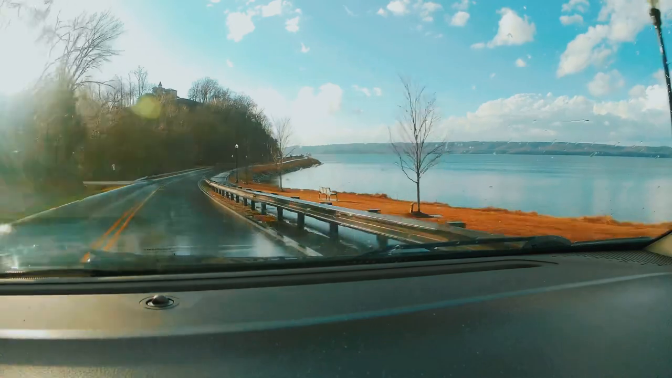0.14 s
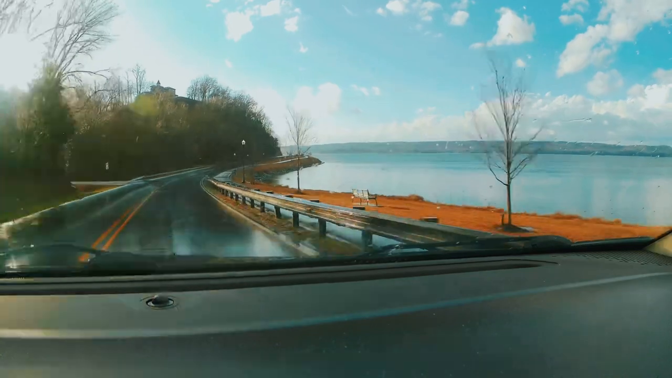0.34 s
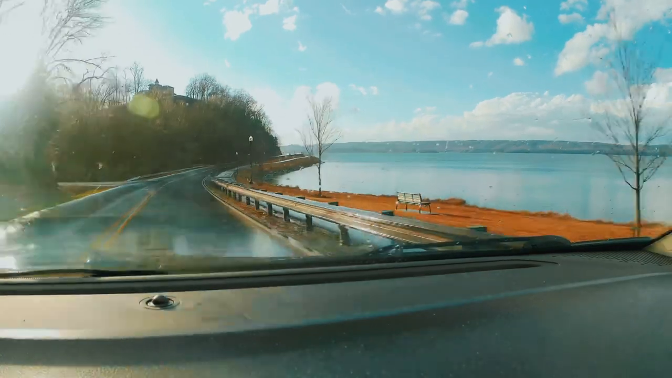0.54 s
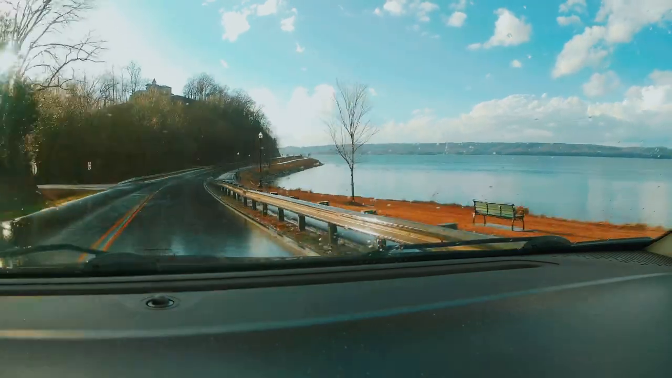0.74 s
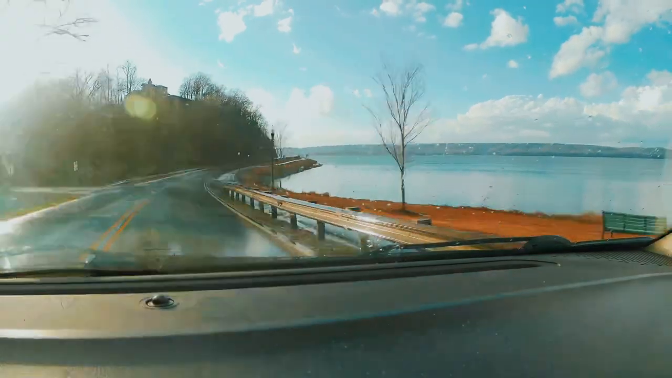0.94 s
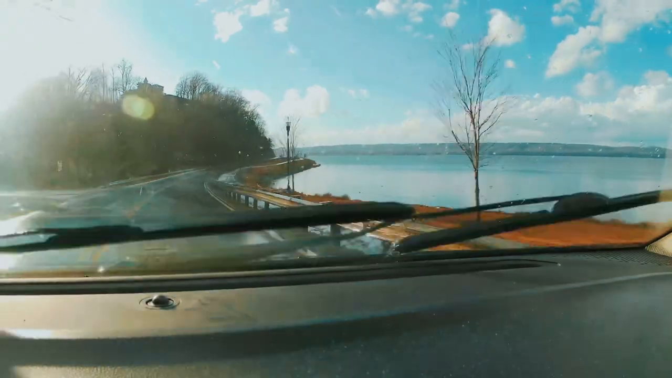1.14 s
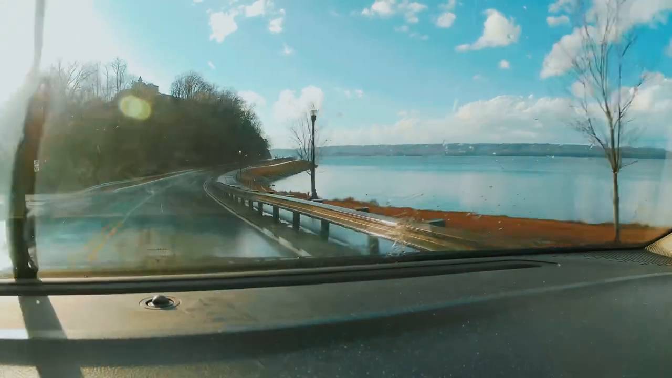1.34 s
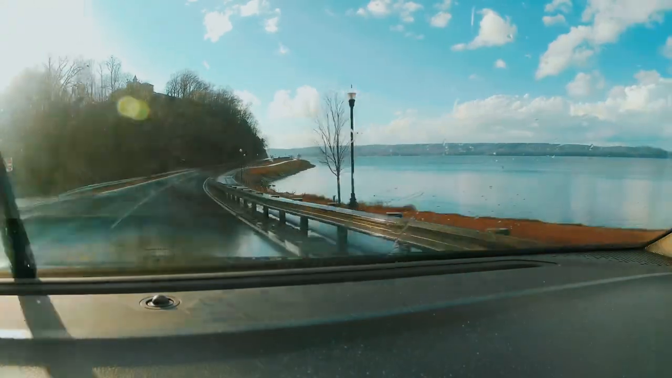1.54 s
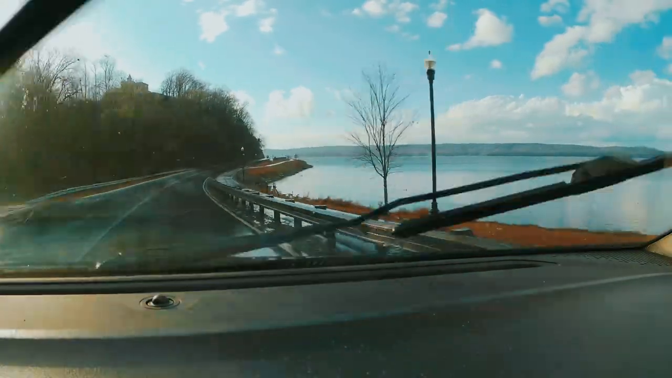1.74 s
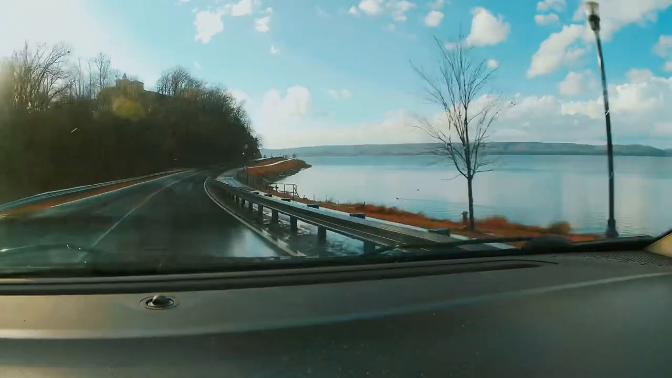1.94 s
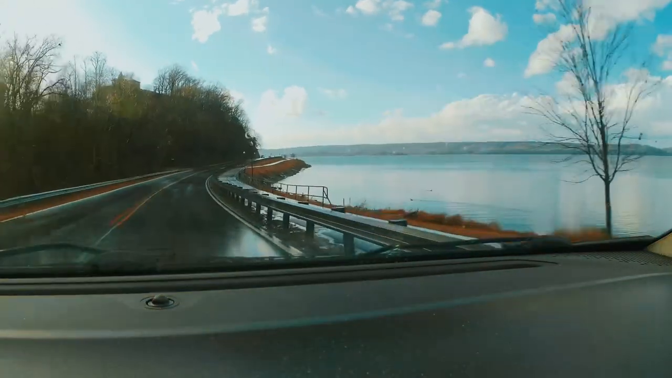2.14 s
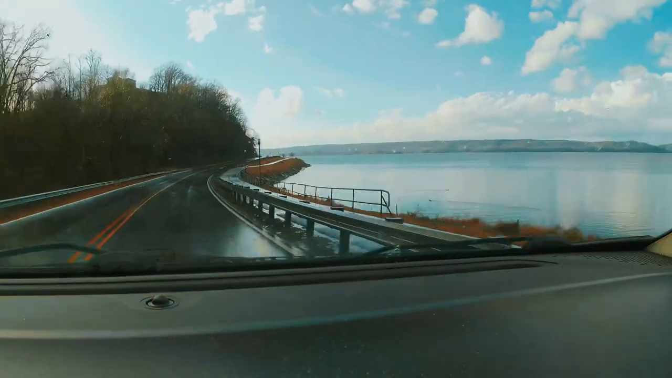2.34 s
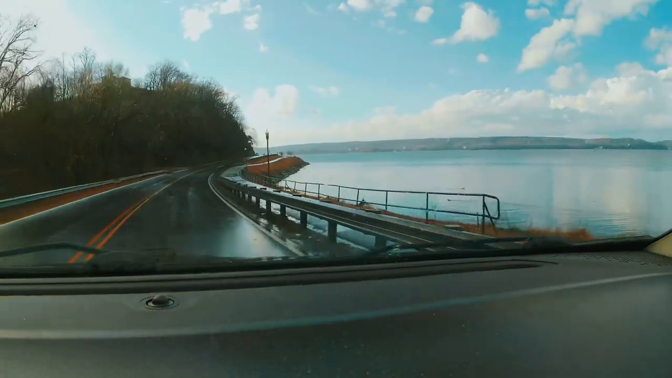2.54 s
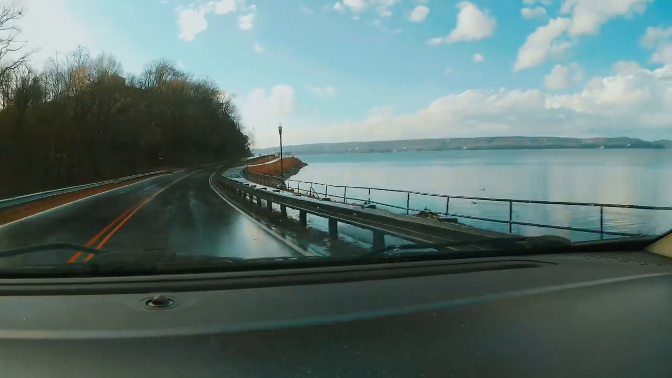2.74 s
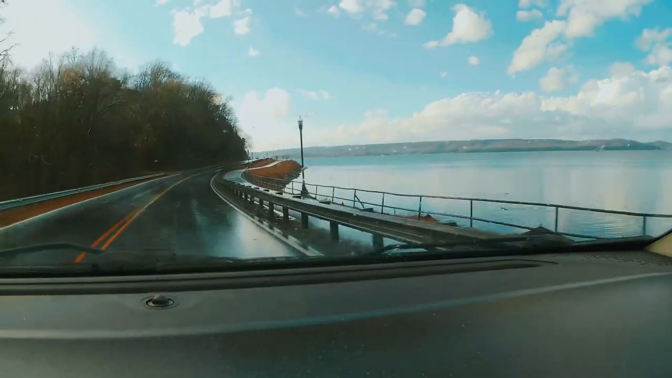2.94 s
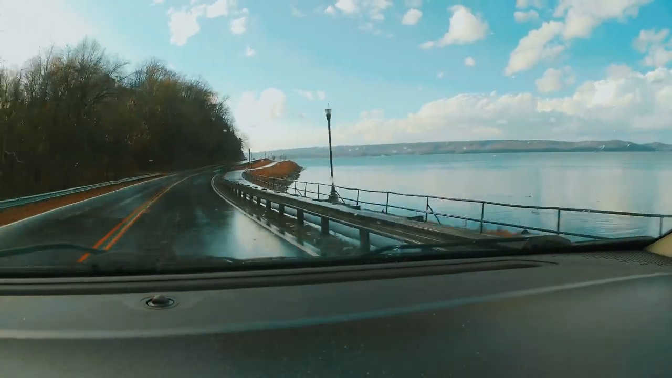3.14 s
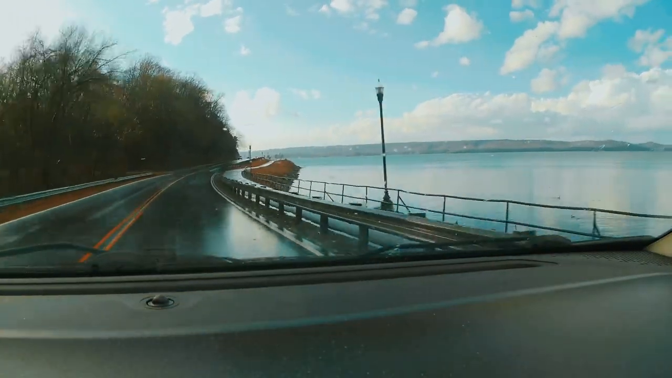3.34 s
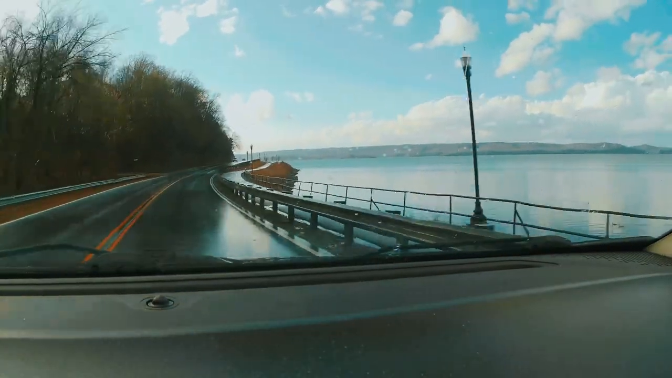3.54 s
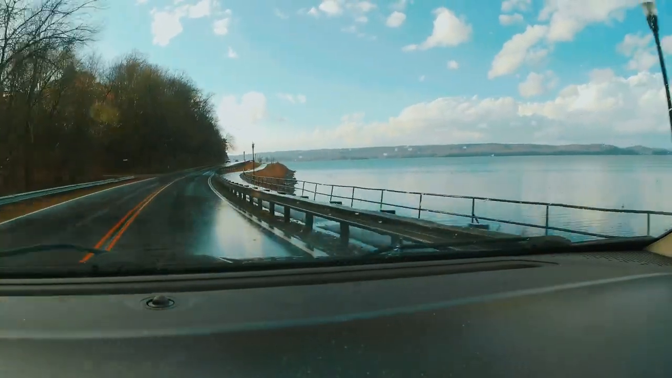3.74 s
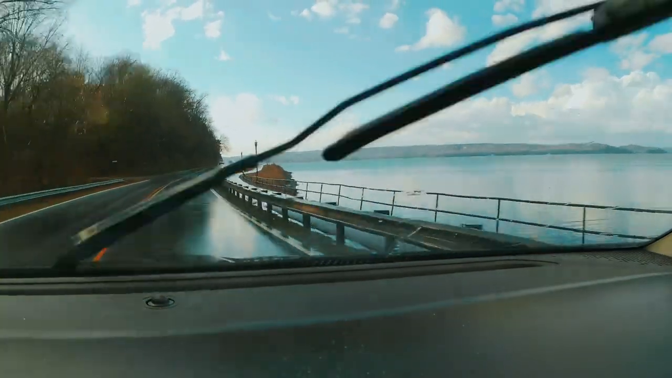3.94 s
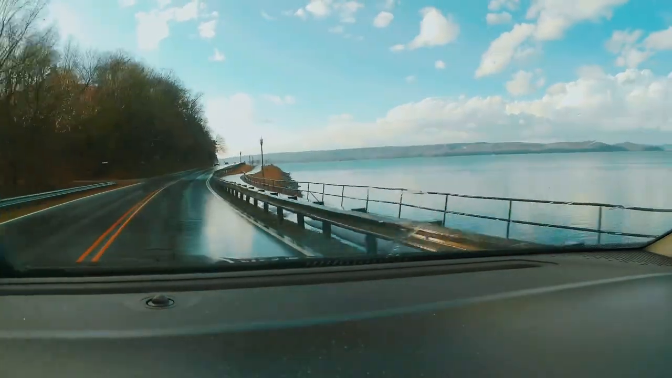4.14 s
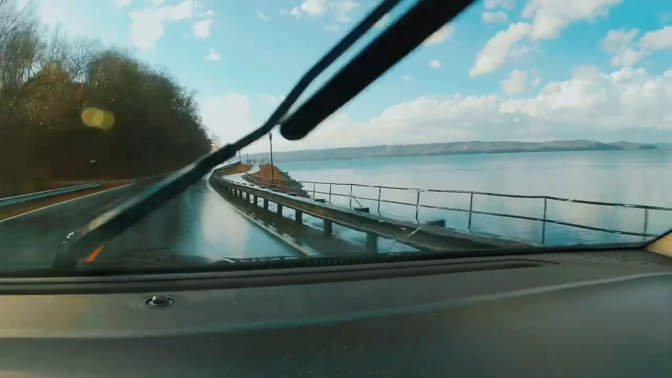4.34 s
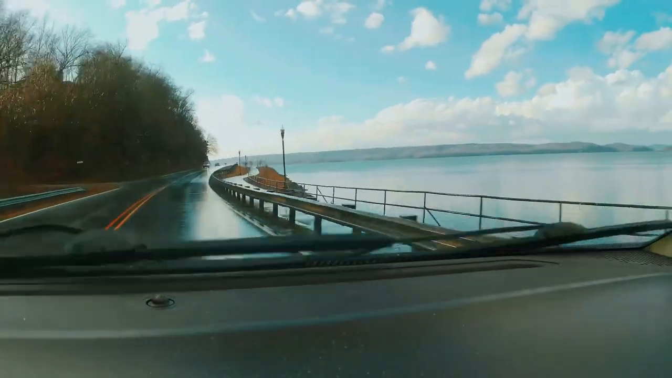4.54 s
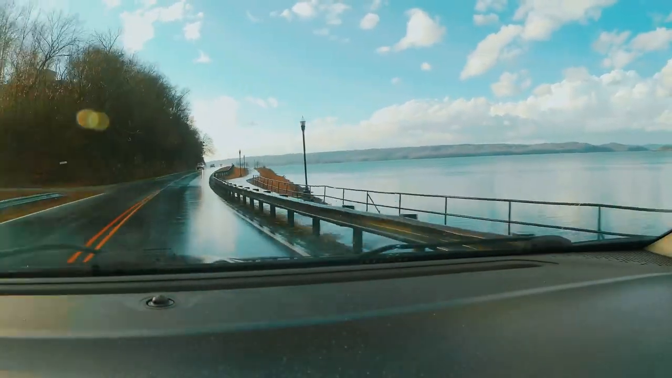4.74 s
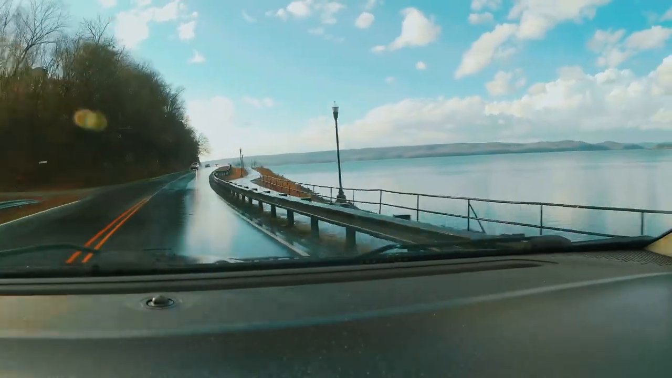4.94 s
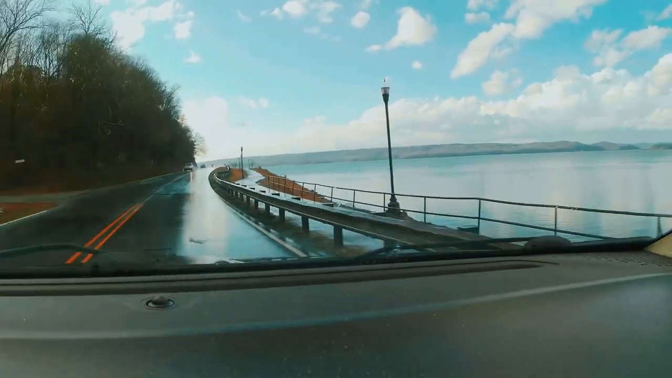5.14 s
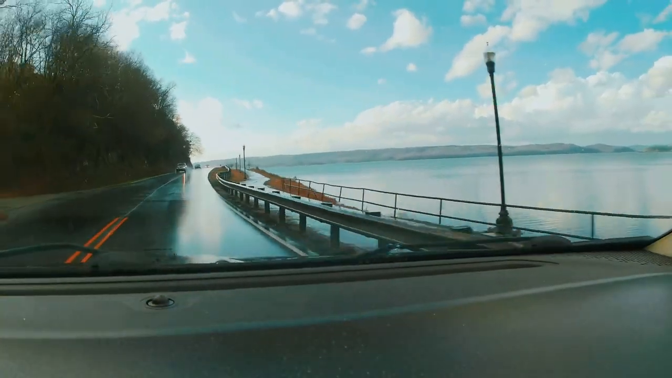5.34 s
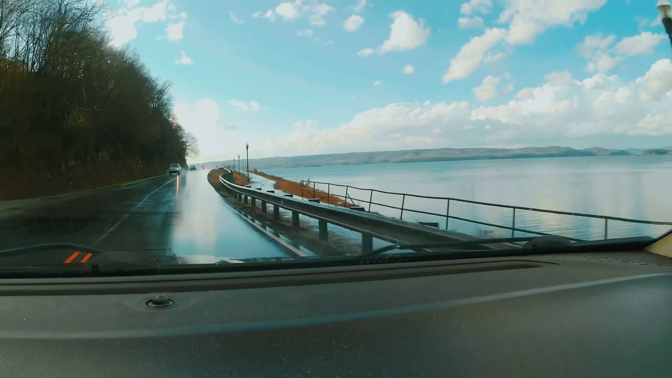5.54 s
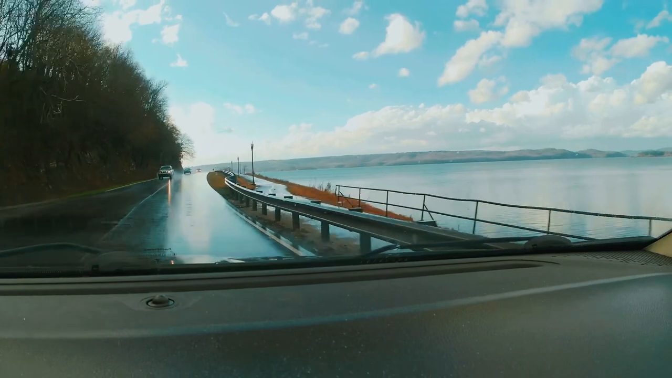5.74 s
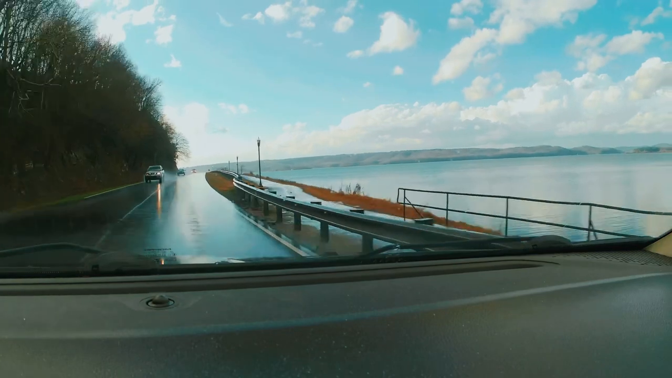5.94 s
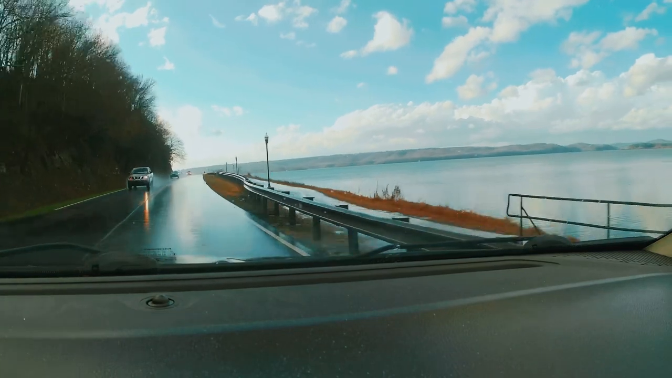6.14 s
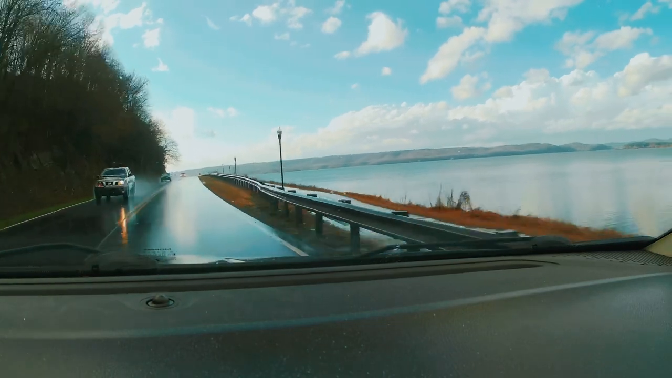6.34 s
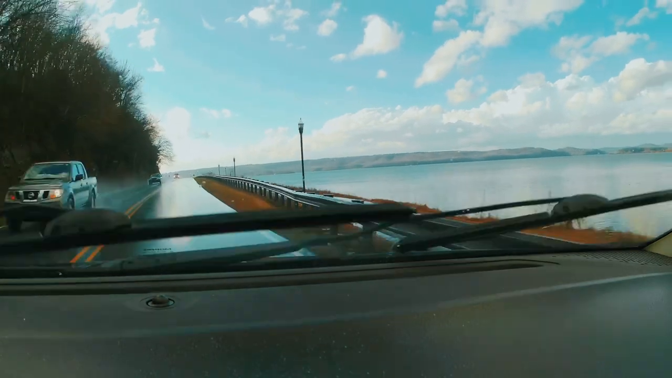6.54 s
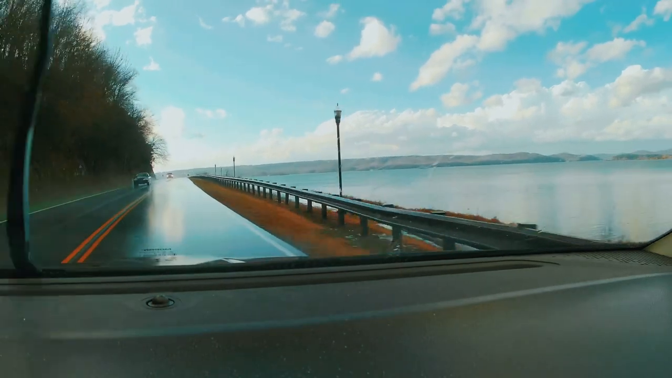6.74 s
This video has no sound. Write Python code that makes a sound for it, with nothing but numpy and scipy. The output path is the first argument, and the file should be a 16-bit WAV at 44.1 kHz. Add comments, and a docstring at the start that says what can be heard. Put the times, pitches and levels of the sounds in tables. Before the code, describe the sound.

Steady low road rumble fills a closed car cabin, swelling with small bumps. Three times, a few seconds apart, a rubber wiper blade sticks and slips across the windscreen in rapid buzzing stutters, with sharp little ticks and a soft thump as it turns or settles. Very faint squeaks follow the second pass. Close, dry, mono interior perspective; the last pass is shorter and ends with a double knock.

```python
"""Wipers juddering in a moving car

Inside a car on a wet road, heard in mono from the cabin: the windscreen close, the road beneath.
Every few seconds the wiper blades drag across nearly dry glass. Stick-slip pulses ring glass resonances,
short noise bursts make the snaps and knocks, and arching near-sines make the faint squeaks.
Behind them resonated noise booms in the cabin, banded noise makes tyre roar and spray hiss,
and one faint whine rises and falls."""
import sys
import numpy as np
from scipy import signal
from scipy.io import wavfile
from scipy.ndimage import uniform_filter1d

SR = 44100
rng = np.random.default_rng(int(sys.argv[2]) if len(sys.argv) > 2 else 0)


def generate_wav(signal):
    """Clip the signal to [-1, 1] and save it as 16-bit WAV at the path in sys.argv[1]."""
    frames = np.transpose(np.atleast_2d(signal))
    scaled = np.clip(frames, -1, 1) * 32767
    pcm = np.round(scaled).astype(np.int16)
    wavfile.write(sys.argv[1], SR, pcm)


def volts(x):
    """Linear amplitude factor 10**(x/20) for a level x in dB, scalar or array-like."""
    e = np.asarray(x, float) / 20
    return 10 ** e


N = 303408   # samples


def in_time(rows):
    """Table columns joined by straight lines, one value a sample."""
    s, *columns = np.transpose(rows)
    return [np.interp(np.arange(N) / SR, s, c) for c in columns]


def rms_one(x):
    """Scales to unit rms."""
    return x / np.sqrt(np.mean(x ** 2) + 1e-20)


def drift(corner_hz):
    """Slow chance of spread 1: noise drawn every 40 samples through a double one-pole low-pass, run in."""
    r = np.exp(-2 * np.pi * corner_hz * 40 / SR)
    noise = rng.standard_normal(N // 40 + 2002)
    slow = signal.lfilter([1], [1, -2 * r, r * r], noise)[2000:]
    return np.interp(np.arange(N) / 40, np.arange(len(slow)), rms_one(slow))


def resonate(x, modes):
    """Parallel resonances with alternating signs."""
    out = 0
    for k, (hz, width_hz, db) in enumerate(modes):
        r = np.exp(-np.pi * width_hz / SR)
        b = np.array([1, 0, -1]) * (1 - r * r) / 2
        a = [1, -2 * r * np.cos(2 * np.pi * hz / SR), r * r]
        out = out + (-1) ** k * volts(db) * signal.lfilter(b, a, x + 1e-18)
    return out


def cut(x, hz, kind, order):
    """Butterworth low-, high- or band-pass."""
    return signal.sosfilt(signal.butter(order, hz, kind, fs=SR, output="sos"), x)


def evened(x, span_s):
    """Divides out the local level, so that a curve can set it."""
    return x / np.sqrt(uniform_filter1d(x ** 2, int(span_s * SR)) + 1e-20)


def dying(x, time_s):
    """Every click becomes a falling exponential."""
    return signal.lfilter([1], [1, -np.exp(-1 / (time_s * SR))], x + 1e-18)


def arch(start_s, length_s):
    """Position within a spell, -1 to 1, and a hump that is one in its middle."""
    place = np.clip(2 * (np.arange(N) / SR - start_s) / length_s - 1, -1, 1)
    return place, 1 - place ** 2


def thin_tone(start_s, length_s, hz, db, sag, waver, octave_db):
    """A wavering near-sine with a weak octave; its pitch arches up and down."""
    place, hump = arch(start_s, length_s)
    pitch_hz = hz * (1 - sag * place ** 2 + waver * drift(80))
    phase = 2 * np.pi * np.cumsum(pitch_hz) / SR
    wave = np.sin(phase) + volts(octave_db) * np.sin(2 * phase)
    level = volts(db + 3.3 * drift(60))
    return np.sqrt(2) * np.minimum(3 * hump, 1) * level * wave


# Spells in which the blade grips the glass; dryness favours the upper ring and the rasp:
# start_s, length_s, judder_db (before the sag), slips_per_s (around which the rate wanders), dryness_db
GRIP_SPELLS = [(1.083, 0.022, -33.5, 180, 1.5), (1.1, .035, -26, 184, -2), (1.145, .022, -25.5, 150, 3.5),
               (1.168, 0.043, -15.5, 130.6, -0.5), (1.222, .055, -19, 114.5, -1),
               (1.281, 0.03026, -26.5, 114, -11), (1.325, 0.0396, -27, 173, 0.5),
               (1.371, 0.066, -24, 150, 5), (1.435, 0.029, -23, 182, -9.5), (1.474, .02, -27, 174, -8),
               (1.499, 0.032, -31.5, 190, -11), (3.788, .025, -31, 179, 5), (3.81, 0.025, -22.5, 174, 1.5),
               (3.829, 0.048, -16.5, 180, 3.5), (3.872, .045, -17.5, 173, 3), (3.919, .052, -15, 162, -5),
               (3.972, .045, -29, 164, -5.5), (4.04, 0.033, -25, 185, 5.5), (4.114, 0.026, -27.5, 168, 0),
               (4.155, 0.017, -36, 185, -14), (4.19, 0.023, -29.5, 165, -6), (6.508, 0.025, -30, 184, 4),
               (6.52, .02, -29, 175, 6), (6.537, 0.044, -17.5, 163, 1), (6.588, 0.027, -17, 175, -1.5),
               (6.61, 0.039, -21.5, 186, -3), (6.644, .05, -29, 158, 2)]


def grip(follows):
    """Every spell rises, sags while it holds and dies away; a layer gains its share of the dryness."""
    attack_s, release_s, full_sag_db = 0.0075, 0.014, 3.5
    t, power = np.arange(N) / SR, 0
    for s, length_s, db, _, dry_db in GRIP_SPELLS:
        rise = np.clip((t - s) / attack_s, 0, 1)
        fall = np.exp(-np.maximum(t - s - length_s, 0) / release_s)
        sag_db = full_sag_db * np.clip((t - s) / length_s, 0, 1)
        power = power + (volts(db + follows * dry_db - sag_db) * rise * fall) ** 2
    return np.sqrt(power)


# Low windscreen resonances: pitch_hz, width_hz, gain_db
GLASS_MODES = [(191, 46.4, 0), (239.4, 66.4, 0), (324, 26.6, 1.5), (485, 87, -11)]
# Upper ring of glass and arm: pitch_hz, width_hz, gain_db
UPPER_MODES = [(632, 160, -2), (872, 124, -4), (960, 160, -7.5), (1315, 400, -14.5)]
# Resonances of the rubber edge: pitch_hz, width_hz, gain_db
RUBBER_MODES = [(1730, 230, 4), (2600, 1330, -3.5), (3650, 720, -4), (4500, 890, -8.5)]
# Share of noise in the slips; the blade sings almost cleanly late in the second sweep: time_s, roughness (0-1)
SLIP_ROUGHNESS = [(1.1, .48), (1.3, .42), (1.5, .46), (3.88, .46), (3.94, .24), (4.02, .18), (4.05, .38),
                  (6.55, .44), (6.7, .4)]
UPPER_DB, RASP_DB = -13.5, -26.5   # over the judder at dryness 0


def judder():
    """The rubber sticks and slips; every slip jolts the glass and lets out a short rasp."""
    per_s, = in_time([(s + length_s / 2, rate) for s, length_s, _, rate, _ in GRIP_SPELLS])
    rough, = in_time(SLIP_ROUGHNESS)
    turns = np.cumsum(per_s * (1 + 0.0927 * rough * drift(42.5))) / SR
    ticks = np.diff(np.floor(turns), prepend=0)   # one click per whole turn
    slips = ticks * volts(8.4 * rough * drift(140)) * np.sqrt(SR / per_s)
    drive = (1 - rough) * slips + rough * rng.standard_normal(N)
    low = cut(cut(resonate(drive, GLASS_MODES), 600, "low", order=2), 140, "high", order=2)
    upper = cut(cut(resonate(drive, UPPER_MODES), 1900, "low", order=2), 450, "high", order=2)

    puffs = 0.023 * dying(slips, 0.0028)   # hiss dies soon after each slip
    rasp = rng.standard_normal(N) * (0.11 + puffs) * volts(1.8 * drift(70))
    edge = cut(resonate(rasp, RUBBER_MODES), 5500, "low", order=2)
    fizz = cut(cut(rasp, 5100, "high", order=2), 9000, "low", order=1)   # fine, from the lip
    edge += volts(-33.5) * fizz

    glass_part = grip(0) * evened(low, 0.044)
    upper_part = volts(UPPER_DB) * grip(1) * evened(upper, 0.42)
    rasp_part = volts(RASP_DB) * grip(1) * evened(edge, 0.039)
    return glass_part + upper_part + rasp_part


# Sharpest breaks of the rubber lip: time_s, click_db (before the filters and their gains)
LIP_BREAKS = [(1.173, -44.5), (1.2029, -46.5), (1.213, -40), (1.2382, -43.5), (1.248, -46), (1.255, -43.5),
              (1.2633, -41), (1.3788, -43), (1.385, -44), (1.4155, -45.5), (1.4762, -42.5), (3.821, -41.5),
              (3.854, -33.5), (3.8727, -38), (3.887, -37), (3.9, -36.5), (3.9237, -35), (3.9614, -36.5),
              (4.0483, -46.5), (4.123, -48), (4.1998, -53), (6.554, -38.5), (6.566, -30.5), (6.615, -43.5),
              (6.6261, -31.5), (6.641, -39)]


def snaps():
    """Each break is a sharp tick and milliseconds of crackle through the rubber edge."""
    small_per_s, small_db = 55, -4.5   # lesser breaks at random; click level over the rasp setting
    s, db = np.transpose(LIP_BREAKS)
    clicks = (rng.random(N) < small_per_s / SR) * volts(RASP_DB + small_db) * grip(0.96)
    clicks[(s * SR).astype(int)] = volts(db)
    noise = rng.standard_normal(N)
    tick = cut(dying(clicks, 0.0012) * noise, 5400, "high", order=2)
    tick = cut(tick, 9000, "low", order=1)
    crackle = cut(resonate(dying(clicks, 0.0028) * noise, RUBBER_MODES), 2500, "high", order=1)
    return volts(-5.5) * tick + volts(12.5) * crackle


# Blades flipping or reaching their rest: start_s, drive_db (peak, before the resonances),
# length_s (the peak comes at 0.27 of it), edge_db (rubber contact over the drive)
BLADE_KNOCKS = [(1.876, -25.5, 0.029, -19), (4.593, -24.5, 0.032, -17.5), (4.634, -35, 0.023, -17),
                (6.506, -26, 0.017, -15), (6.811, -23.5, 0.013, -12), (6.827, -26, 0.029, -13.5)]


def knocks():
    """A brief rattle of the arm that swells, dies and rings the glass."""
    t, shape, contact = np.arange(N) / SR, np.zeros(N), np.zeros(N)
    for s, db, length_s, edge_db in BLADE_KNOCKS:
        age = np.maximum(t - s, 0) / (0.27 * length_s)
        swell = age * np.exp(1 - age)
        shape += volts(db) * swell
        contact += volts(db + edge_db) * swell
    grit = rng.standard_normal(N)
    rattle = cut(shape * grit, 2200, "low", order=2)
    edge = cut(resonate(contact * grit, RUBBER_MODES), 4500, "low", order=2)
    return volts(19.5) * resonate(rattle, GLASS_MODES) + volts(11) * resonate(rattle, UPPER_MODES) + edge


# Rubber squeaks: start_s, length_s, pitch_hz (top of the arch, before waver), level_db (before waver)
RUBBER_SQUEAKS = [(4.347, 0.024, 2070, -56.5), (4.402, .03, 2540, -65), (4.425, 0.035, 2200, -63.5),
                  (4.471, 0.045, 1950, -65)]


def squeaks():
    """Short rubber tones whose pitch sags by a share of itself at both ends."""
    return sum(thin_tone(*row, sag=.06, waver=0.033, octave_db=-16) for row in RUBBER_SQUEAKS)


def swish():
    """A faint puff of high hiss as the blade turns."""
    hiss = rms_one(cut(cut(rng.standard_normal(N), 5500, "high", order=2), 9000, "low", order=1))
    _, hump = arch(start_s=4.24, length_s=.06)
    return hump * volts(-71.5) * hiss


# Cabin air resonances: pitch_hz, width_hz, gain_db (relative)
CABIN_MODES = [(55.17, 11.7, 2), (70.65, 12.6, -3)]
# Body and suspension resonances: pitch_hz, width_hz, gain_db (relative)
BODY_MODES = [(25.3, 22, 0), (40.6, 6.3, -3.5)]
# Bumps in the road that swell the boom: peak_s, level_db (added as power), length_s
ROAD_BUMPS = [(0.148, -22, .1), (0.482, -20, 0.13), (0.783, -18.5, 0.065), (0.926, -18.5, 0.06),
              (0.978, -18.5, .07), (1.542, -25, 0.75), (1.789, -27, .1), (2.31, -23.5, .12),
              (2.574, -21.5, 0.17), (2.812, -18.5, 0.047), (2.92, -18, 0.061), (3.29, -28, 0.17),
              (3.442, -16, 0.054), (3.573, -17, 0.23), (3.85, -20, 0.13), (4.351, -22, .12),
              (4.53, -20.5, .06), (4.65, -24.5, 0.13), (5.404, -26, 0.25), (5.588, -22, 0.068),
              (5.687, -20, 0.047), (6.03, -20.5, 0.043), (6.15, -18, 0.11), (6.276, -17, 0.044),
              (6.38, -19, .07), (6.761, -23.5, .14)]


def cabin():
    """Road shocks keep the cabin air booming and the body shaking."""
    boom_db, boom_waver_db, shake_db = -29.5, 3.5, -32   # boom level between the bumps
    t = np.arange(N) / SR
    power = volts(2 * (boom_db + boom_waver_db * drift(6)))
    for s, db, length_s in ROAD_BUMPS:
        power = power + volts(2 * db) * np.exp(-8 * ((t - s) / length_s) ** 2)
    shocks = rng.standard_normal((2, N + SR))   # the first second only runs the filters in
    boom = resonate(cut(shocks[0], 95, "low", order=4), CABIN_MODES)[SR:]
    shake = resonate(cut(shocks[1], 54.2, "low", order=4), BODY_MODES)[SR:]
    return np.sqrt(power) * evened(boom, .08) + volts(shake_db) * evened(shake, 0.56)


# Colour of the road noise, before the overall level: pitch_hz, gain_db
ROAD_COLOUR = [(95, -0.5), (139, -7.5), (200, -6.5), (320, -16), (750, -26.5), (891, -30.5), (1310, -37.5),
               (1520, -42), (2320, -43), (3500, -47.5), (4800, -48), (5600, -51.5), (7500, -58.5),
               (15500, -66.5)]
# Coarseness of the road: time_s, roar_change_db
ROAD_COARSENESS = [(0, 0), (1, 1.5), (1.6, 3), (2.2, 0), (3.5, 2.5), (4.3, 4), (4.9, 1), (5.8, 0.5),
                   (6.88, 3.7)]
# Trim and tyre cavity resonances, before the overall level: pitch_hz, width_hz, gain_db
PANEL_MODES = [(102.3, 13.4, -5), (197.5, 14.4, -8.5), (258, 10, -13.5), (308.7, 10, -14), (580, 25, -27),
               (1360, 29, -36), (1655, 22, -38.5), (2352, 77, -42)]


def tyres(level_db, patchy_db):
    """Quarter-octave noise bands; roar rules the low ones, spray the high ones."""
    roar_db, = in_time(ROAD_COARSENESS)
    hiss_db = -0.66 + .15 * roar_db   # spray follows a share of the roar's change
    edges = 80 * 2 ** np.arange(0, 7.8, 1 / 4)
    out, together = 0, drift(6)
    white, points = rng.standard_normal((2, N)), np.array(ROAD_COLOUR)
    for k, (low, high) in enumerate(zip(edges, edges[1:])):
        band = cut(white[k % 2], [low, high], "band", order=2)
        hz = np.sqrt(low * high)
        spray = np.clip(np.log2(hz / 500) / 2, 0, 1)   # none below 500 Hz, all above 2 kHz
        colour_db = np.interp(np.log(hz), np.log(points[:, 0]), points[:, 1])
        change_db = spray * hiss_db + (1 - spray) * roar_db
        flicker_db = patchy_db * (0.73 * together + drift(13.0))
        out = out + band * volts(colour_db + change_db + flicker_db)
    panels = volts(roar_db) * resonate(rng.standard_normal(N), PANEL_MODES)   # narrow humps on the roar
    return volts(level_db) * (out + panels)


def whine():
    """A faint whine, a near-sine whose pitch rises and falls once."""
    return thin_tone(start_s=5.0, length_s=.6, hz=1300, db=-68, sag=.09, waver=0.0026, octave_db=-24)


def scene():
    """The wipers over the ride noise, as one mono channel."""
    wipers = judder() + snaps() + knocks() + squeaks() + swish()
    ride = cabin() + tyres(level_db=-11.5, patchy_db=0.6) + whine()
    return (wipers + ride)[None]


def top_cut(x):
    """Nothing passes above the cut-off."""
    return signal.sosfilt(signal.butter(12, 15720, fs=SR, output="sos"), x)


def record(dry):
    """Peaks are gently rounded by a tanh curve."""
    mix = 0.81 * np.tanh(dry / 0.78)
    return top_cut(mix)


dry = scene()
out = record(dry)
generate_wav(out)
```